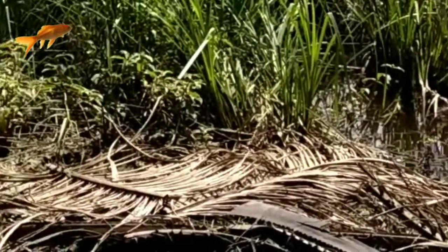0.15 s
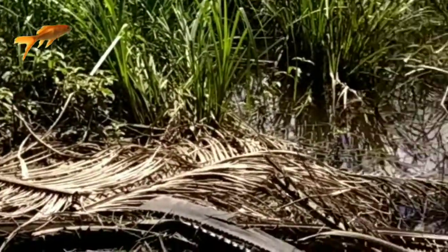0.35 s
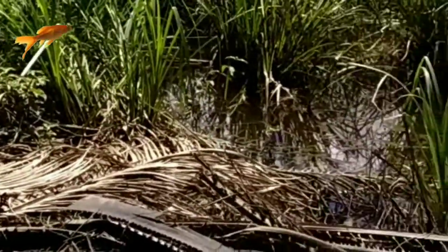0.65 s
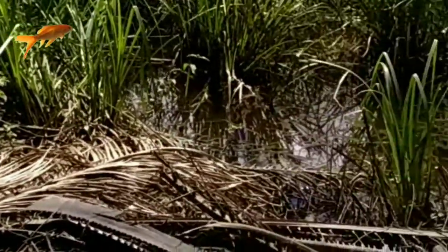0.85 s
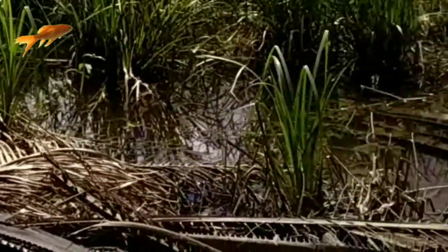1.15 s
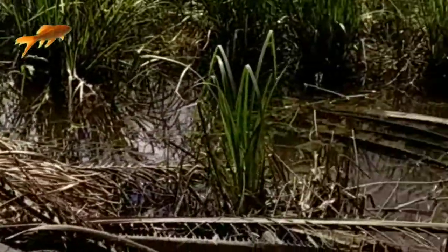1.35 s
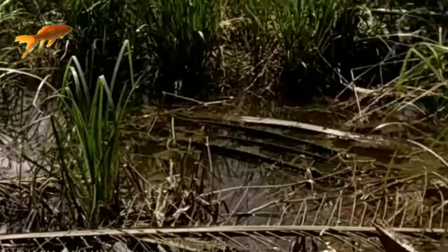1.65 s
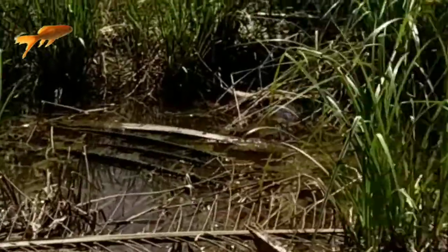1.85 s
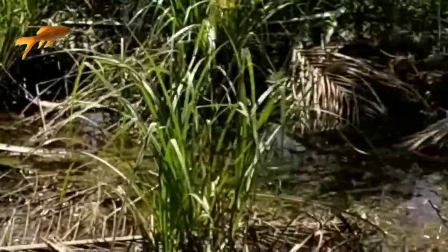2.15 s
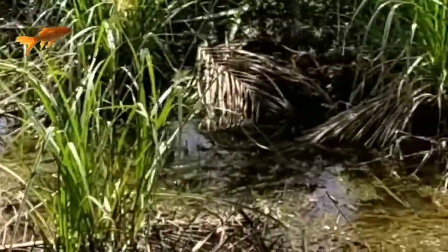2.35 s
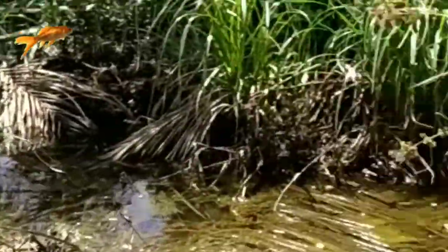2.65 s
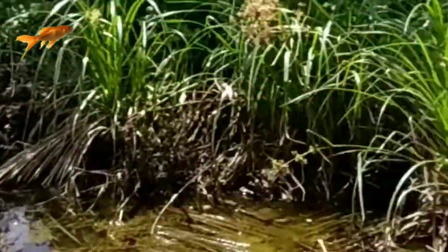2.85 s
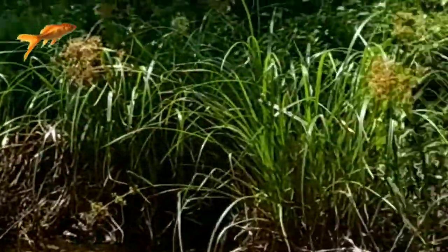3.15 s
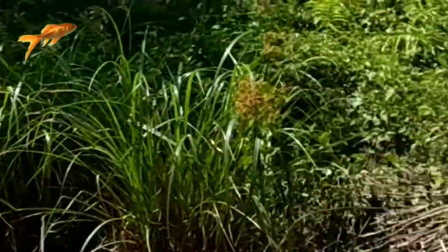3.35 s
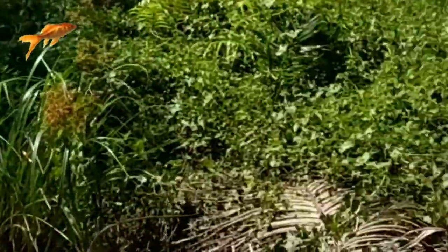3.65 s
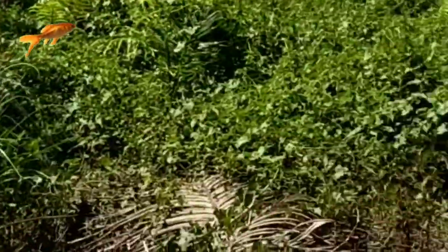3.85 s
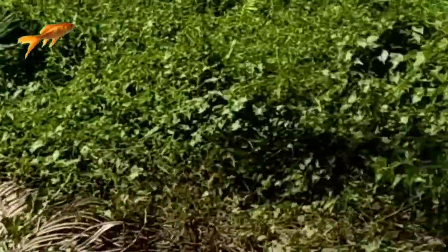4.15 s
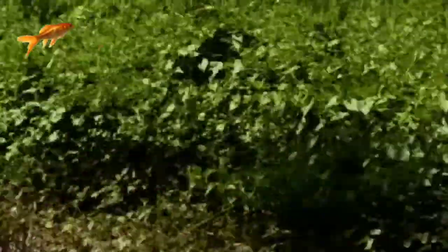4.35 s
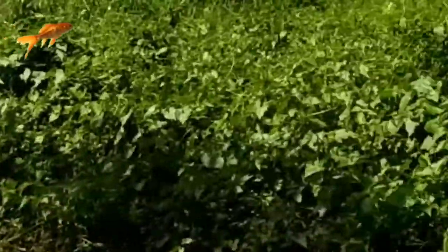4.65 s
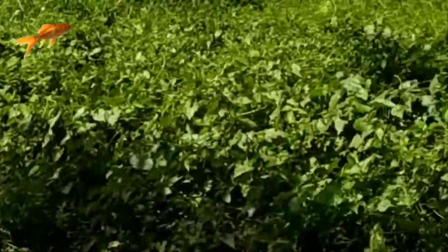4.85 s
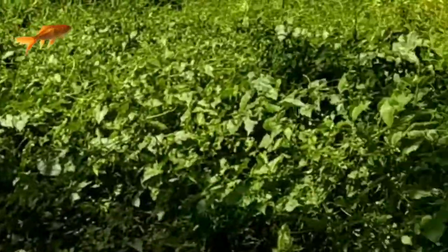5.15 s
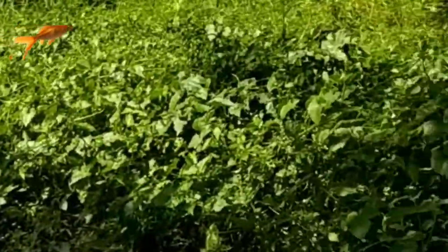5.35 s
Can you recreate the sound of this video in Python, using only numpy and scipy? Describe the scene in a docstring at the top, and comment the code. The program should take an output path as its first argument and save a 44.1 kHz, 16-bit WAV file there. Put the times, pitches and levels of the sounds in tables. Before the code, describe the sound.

Crickets shrill in a rapid, steady buzz outdoors; a handling knock, a rustling snap of dry leaves, and a late faint click interrupt.

```python
"""Two crickets trill throughout in a sunny swamp, in fast three-stroke chirps, over a chorus of far insects.
The hand-held microphone is knocked at 0.3 s; from 0.8 s puffs of light air buffet its ports.
Birds call faintly far away from 1.2 s; around 2 s a step rustles and snaps dry fronds, and 5.3 s brings
one more sharp snap. Crickets and birds are gliding tones; insects, air and scuffs are shaped noise;
snaps are filtered clicks, and knocks are single pressure swings."""
import sys
import numpy as np
from scipy import signal
from scipy.fft import rfft, irfft
from scipy.io import wavfile

SR = 44100
rng = np.random.default_rng(int(sys.argv[2]) if len(sys.argv) > 2 else 0)


def inscribe(sig):
    """Save sig as 16-bit PCM at rate SR to the path in sys.argv[1].

    A 1-D sig is mono; a 2-D sig holds one channel per row.
    Samples are clipped to [-1, 1] before scaling.
    """
    pcm = np.round(np.clip(np.atleast_2d(sig).T, -1, 1) * 32767)
    wavfile.write(sys.argv[1], SR, pcm.astype(np.int16))


N = 242991
TIME = np.arange(N) / SR   # seconds


def from_db(db):
    """Turn decibels into a gain."""
    return 10 ** (np.asarray(db) / 20)


def rms_one(x):
    """Scale to unit power."""
    return x / np.sqrt(np.mean(x ** 2) + 1e-20)


def in_time(rows):
    """Draw each column of a table as a curve through time, joined by straight lines."""
    s, *columns = np.transpose(rows)
    return [np.interp(TIME, s, column) for column in columns]


def panned(x, balance_db):
    """Place a sound between the sides; a positive balance makes the left louder."""
    lean = from_db(np.atleast_1d(balance_db) / 2)
    return x * np.array([lean, 1 / lean])


def swell(s, half_s):
    """A smooth, bell-shaped rise and fall around a moment."""
    return np.exp(-np.minimum(((TIME - s) / half_s) ** 2 / 2, 50))


def drift(rate_hz):
    """A random curve of spread 1 whose changes weaken above the given rate."""
    hz = np.fft.rfftfreq(N, 1 / SR)
    return rms_one(irfft(rfft(rng.standard_normal(N)) / (1 + (hz / rate_hz) ** 2), N))


def passband(x, low_hz, high_hz):
    """Keep mainly what lies between two frequencies."""
    edges = [low_hz, np.clip(high_hz, low_hz + 50, SR * .45)]
    return signal.sosfilt(signal.butter(2, edges, "band", fs=SR, output="sos"), x)


def noise(spectrum, alike):
    """Steady stereo noise of a given colour; alike runs from 0 (unrelated sides) to 1 (same on both)."""
    table_hz, table_db = np.transpose(spectrum)
    hz = np.fft.rfftfreq(N, 1 / SR)
    gain = from_db(np.interp(np.log(hz + 1), np.log(table_hz), table_db, left=-90, right=-90))
    mid, side = irfft(rfft(rng.standard_normal((2, N))) * gain, N)
    alike = np.clip(alike, -1, 1)
    return rms_one(np.sqrt(1 + alike) * mid + np.sqrt(1 - alike) * side * [[1], [-1]])


def thicket(x, scatter_db, t60, count=4):
    """Stems and leaves add a short diffuse tail, different on each side, that shifts as the microphone turns."""
    age = TIME[:SR // 5]
    out = np.array([x, x])
    for _ in range(count):
        # each tail falls 60 dB in t60 seconds
        tail = rng.standard_normal((2, len(age))) * from_db(-60 * age / t60)
        tail /= np.sqrt(count * np.sum(tail ** 2, axis=1, keepdims=True))
        turns_per_s = rng.uniform(0.52, 1)
        turn = np.sqrt(2) * np.cos(2 * np.pi * (turns_per_s * TIME + rng.random()))
        scattered = signal.oaconvolve(x[None], tail, axes=1)[:, :N]
        out += from_db(scatter_db) * turn * scattered
    return rms_one(out)


def crickets():
    """Two singers at slightly different pitch and pace slide in and out of step."""
    # the near cricket, as the microphone turns past it: t/s, level before a 5 dB cut/dB, left over right/dB
    near_place = [(0, -41.5, 4), (.3, -38.5, 1), (.95, -36.5, 3), (1.15, -36.5, -2), (1.5, -37, 4),
                  (2, -35.5, 3), (2.5, -39.5, -0.5), (3, -46, 14), (3.4, -45.5, 8), (3.8, -48, 4),
                  (4.4, -44, -1), (5.5, -51, 2)]
    # the farther, higher cricket: t/s, level/dB, left over right/dB
    far_place = [(0, -78, -8), (.5, -63, -2), (2.4, -61.5, 10), (3.1, -54, 5), (4, -51, -3),
                 (4.5, -55.5, -3), (5.5, -58, 4)]
    # the wings' octave, beamed more narrowly: t/s, level/dB, left over right/dB
    octave_place = [(0, -62.5, 26), (2.2, -56.5, 18), (2.6, -48, 6.5), (3.3, -64.5, 36), (4.4, -51.5, 12),
                    (5.5, -59, 20)]
    # how far each cricket falls behind an even pace: t/s, lag/s
    near_lag = [(0, -.003), (.3, -.0035), (.9, -.002), (1.55, -.0042), (1.85, -.004), (2.5, .0012),
                (2.82, -.0005), (2.98, -.003), (3.3, -.0028), (3.6, .0007), (4, .0015), (4.15, .0043),
                (4.8, .0032), (5.4, .008)]
    far_lag = [(0, .018), (2.3, .0195), (2.85, .0168), (3.4, .0076), (3.9, -.002), (4.4, -.0077),
               (5.5, -.0159)]
    # the near cricket leans by degrees into its opening stroke: t/s, that stroke against the other two/dB
    near_opening = [(0, -9.5), (.9, -3.5), (1.6, -2.5), (2.1, -1)]
    near_wander_db, near_wander_hz = .6, 7.4
    wing_edge_hz = 6300   # the wings radiate next to nothing below this

    near_db, near_pan = in_time(near_place)
    far_db, far_pan = in_time(far_place)
    octave_db, octave_pan = in_time(octave_place)
    near, near_octave = wings(near_lag, hz=7311, fall_hz=125, stroke_s=0.0024,
                              opening_db=in_time(near_opening)[0], uneven_db=1.1,
                              scatter_hz=25, rasp=0.035)
    far, far_octave = wings(far_lag, hz=8010, fall_hz=235.0, stroke_s=0.00227,
                            opening_db=-11, uneven_db=1.0, scatter_hz=49.9, rasp=0.31)

    near = thicket(near, scatter_db=-16, t60=.06)
    near_level = from_db(near_db - 5.0 + near_wander_db * drift(near_wander_hz))
    near = panned(near, near_pan) * near_level
    far = panned(thicket(far, scatter_db=-9.5, t60=0.038), far_pan) * from_db(far_db)
    octave = thicket(near_octave + from_db(8.0) * far_octave, scatter_db=-6, t60=0.14)
    song = near + far + panned(octave, octave_pan) * from_db(octave_db)
    return signal.sosfilt(signal.cheby1(10, .2, wing_edge_hz, "high", fs=SR, output="sos"), song)


def wings(lag, hz, fall_hz, stroke_s, opening_db, uneven_db, scatter_hz, rasp):
    """Three wing strokes a chirp, each a short tone that sinks as the scraper slows; gives tone and octave."""
    chirps_per_s = 24.19
    stroke_gap_s, stroke_slip_s = .0103, .00015   # spacing, and its random spread
    squareness = 2.7     # 2 = bell-shaped stroke, more = flatter top
    octave_rasp = .4     # phase wobble of the octave, radians (rasp is that of the tone)

    # which chirp and which stroke (-1, 0 or 1) each sample belongs to
    beat = (TIME - in_time(lag)[0]) * chirps_per_s
    chirp = np.round(beat).astype(int)
    in_chirp = (beat - chirp) / chirps_per_s
    stroke = np.clip(np.round(in_chirp / stroke_gap_s), -1, 1).astype(int)

    # every stroke has its own strength, pitch, starting phase and timing
    force, detune, start, slip = rng.standard_normal((200, 3, 4))[chirp, stroke + 1].T
    travel = (in_chirp - stroke * stroke_gap_s - stroke_slip_s * slip) / stroke_s
    stroke_db = opening_db * (stroke < 0) + uneven_db * force
    pressure = np.exp(-np.abs(travel) ** squareness) * from_db(stroke_db)
    pitch = hz - fall_hz * np.clip(travel, -2, 2) + scatter_hz * detune
    phase = 2 * np.pi * (np.cumsum(pitch) / SR + start)   # every stroke starts the wing afresh
    teeth = drift(960)   # uneven teeth roughen the tone, and the octave more
    tone = pressure * np.sin(phase + rasp * teeth)
    octave = pressure * np.sin(2 * phase + octave_rasp * teeth)
    return tone, octave


def chorus():
    """Countless far insects merge into a steady band; higher groups swell and ebb, each on its own."""
    # colour of the steady band: f/Hz, relative level per Hz/dB
    band_colour = [(6400, -68), (6700, -11.5), (7000, 6.5), (7400, 6.5), (7700, 4), (8000, 5), (8600, -17),
                   (9600, -18), (10600, -19.5), (13500, -27.5), (14050, -6), (14950, -9), (15400, -15),
                   (16000, -27)]
    # a higher fizz of insects, left behind as the microphone turns: t/s, level/dB
    fizz_level = [(0, -58), (.7, -57.5), (1.3, -58.5), (2, -54), (2.4, -59), (4, -61), (5.5, -61)]
    # groups within the fizz: centre f/Hz, width/Hz, level against the fizz/dB
    fizz_groups = [(8320, 350, 0), (8990, 350, -3.5), (9680, 690, -4)]
    swell_db, swell_rate_hz = 3, 20

    out = noise(band_colour, alike=0.043) * from_db(-45)
    fizz_db = in_time(fizz_level)[0]
    for hz, width, db in fizz_groups:
        hiss = rng.standard_normal((2, N))
        group = rms_one(passband(hiss, hz - width / 2, hz + width / 2))
        out = out + group * from_db(fizz_db + db + swell_db * drift(swell_rate_hz))
    return out


def knocks():
    """Each bump squeezes the air at a port: one swing up, one down, and the other way round on letting go."""
    # knocks on the housing: t/s, peak level/dB, half-width/s, left over right/dB, +1 pressed or -1 let go
    thumps = [(0.287, -24.5, 0.0034, -26, 1), (0.2836, -32, 0.00082, -31.5, 1),
              (0.2949, -33.5, 0.0011, -21, -1), (0.312, -43.5, 0.0014, -14, 1), (.326, -49, 0.0035, -21, 1),
              (2.0384, -44.5, 0.00064, 18, 1), (2.048, -45, 0.0012, 11, 1), (2.055, -44.5, 0.00074, -7, 1),
              (2.185, -48, 0.00061, -15, 1), (2.193, -43.5, 0.00133, -12, 1),
              (2.2691, -44.5, 0.00067, 27, 1), (2.274, -42.5, 0.002, 20.5, 1), (2.304, -49.5, 0.001, 21, 1),
              (2.317, -47.5, 0.0024, 24, 1)]
    out = np.zeros((2, N))
    for s, db, width, pan, way in thumps:
        u = np.sign(way) * np.clip((s - TIME) / width, -10, 10)
        out += panned(from_db(db) * u * np.exp((1 - u ** 2) / 2), pan)
    return out


def snaps():
    """Brittle contacts ring for only a few cycles, as clicks through a band filter."""
    # sharp snaps and ticks: t/s, peak level/dB, low f/Hz, high f/Hz, left over right/dB
    snap_rows = [(0.282, -34, 450, 840, -17.5), (0.2826, -35.5, 2040, 2620, -26),
                 (0.2948, -20, 6500, 9700, -27), (0.3135, -33, 7000, 11000, -18),
                 (1.9, -50.5, 607, 3000, -13), (1.942, -54, 4200, 6203, 0), (1.955, -49, 250, 900, -10),
                 (1.967, -47, 250, 1300, -8), (1.972, -50, 250, 800, -10), (2.004, -47, 700, 3500, -3),
                 (2.011, -43, 250, 1800, -1), (2.0276, -31, 250, 3600, -16), (2.03, -38, 300, 3000, -8),
                 (2.037, -40, 464, 1650, 13), (2.044, -48, 1800, 3400, 6), (2.23, -39, 2400, 4300, 15),
                 (2.235, -38, 2800, 4406, 14), (2.2355, -42, 1500, 3800, 12),
                 (2.2379, -30.5, 930, 1590, 21.5), (2.2365, -36, 2360, 5870, 13),
                 (2.2374, -36, 9400, 10800, 13), (2.2386, -28, 2030, 4330, 24.5),
                 (2.258, -31, 7000, 10500, 9), (2.2726, -25, 5800, 13400, 19), (2.2726, -45, 1500, 6000, 2),
                 (5.269, -29, 8500, 10500, 4), (5.27, -50, 500, 1800, -3), (5.269, -43.5, 3800, 5720, 2)]
    out = np.zeros((2, N))
    for s, db, low, high, pan in snap_rows:
        click = passband(signal.unit_impulse(SR // 20, 0), low, high)
        click = click / np.abs(click).max() * from_db(db)
        start = round(s * SR)
        out[:, start:start + len(click)] += panned(click, pan)
    return out


def scuffs(crackle_db=4.5):
    """Rubbing swells and fades as a cloud of tiny uneven cracks."""
    # fingers, feet and dry leaves: centre t/s, level/dB, half-length/s, low f/Hz, high f/Hz, left over right/dB
    scuff_rows = [(0.025, -54, 0.0032, 210, 390, 0.5), (0.174, -55.5, 0.002, 120, 380, -9),
                  (0.2852, -32, 0.0013, 7000, 8900, -11), (0.28, -35, 0.0024, 1580, 11000, -17.5),
                  (0.2826, -41, 0.0015, 330, 650, -8.5), (0.2865, -37, 0.0018, 3800, 5500, -12),
                  (0.293, -40, 0.00087, 7300, 10600, -14), (0.304, -42, 0.004, 6200, 13000, -4),
                  (0.3027, -54, 0.006, 260, 4600, -7), (0.765, -61.5, 0.0063, 150, 430, -5),
                  (0.788, -60.5, 0.005, 250, 860, -3), (1.224, -64.5, 0.012, 140, 680, -4),
                  (1.635, -59.5, 0.036, 250, 12000, -1), (1.974, -55.5, 0.026, 120, 550, -16),
                  (1.975, -54, 0.061, 1200, 13000, -4), (1.98, -50.5, .009, 8000, 12000, 2),
                  (2.03, -49, 0.017, 130, 570, -4), (2.033, -57, 0.016, 990, 3700, 4.5),
                  (2.029, -48, .002, 400, 4000, -8), (2.238, -42.5, 0.0075, 980, 4300, 3),
                  (2.239, -47, 0.012, 90, 437, 1), (2.272, -56, 0.004, 400, 6700, 3),
                  (3.016, -58.5, 0.017, 180, 4700, 3.5), (3.008, -62, .012, 250, 460, 1),
                  (4.09, -69, 0.077, 200, 510, -2), (4.068, -66, 0.0043, 250, 780, -1),
                  (4.127, -60.5, .006, 230, 450, -2), (5.282, -47, 0.015, 8040, 15300, 3),
                  (5.283, -59, .009, 5140, 5700, -2), (5.277, -59, 0.0089, 400, 3300, 3)]
    out = np.zeros((2, N))
    crackle = from_db(crackle_db * np.clip(drift(470), -2, 2))
    grains = rng.standard_normal((2, N)) * crackle
    for s, db, half_s, low, high, pan in scuff_rows:
        rub = rms_one(passband(grains, low, high))
        out += panned(rub * swell(s, half_s) * from_db(db), pan)
    return out


def wind():
    """Puffs ride on a faint, unsteady breeze; each drives big lumps and small eddies at the ports."""
    # puffs: t/s, level before a final 1 dB cut/dB, half-length/s, eddies against lumps/dB, left over right/dB
    gusts = [(0.833, -59, 0.026, -7, -16), (0.982, -54, 0.043, -18, -20), (1.165, -54, 0.021, -2, -18),
             (1.306, -43, 0.012, -7, -17), (1.518, -50, 0.015, -7, 23), (1.79, -53, 0.084, -7, 12),
             (2.304, -46.5, 0.064, -13, -1.5), (2.79, -64, 0.29, -5.5, -9), (3.54, -64, 0.033, -34, 27),
             (3.78, -43.5, 0.039, -4.5, -8), (3.935, -43.5, 0.042, -4, -13.5),
             (4.269, -39.5, 0.032, -9, 13.5), (4.44, -48.5, 0.033, -16, 18)]
    # colour of the big lumps: f/Hz, relative level per Hz/dB
    lump_colour = [(12, 4), (25, -2.5), (45, -10), (65, -16), (100, -58), (200, -51)]
    # colour of the small eddies: f/Hz, relative level per Hz/dB
    eddy_colour = [(40, 4), (66, 3.5), (90, -10), (125, -19), (200, -56)]
    # the breeze between puffs: t/s, level before the same 1 dB cut/dB
    breeze_level = [(0, -60), (2, -55), (3.3, -56.5), (4.7, -53.5), (5.3, -66)]
    breeze_swing_db, breeze_eddies_db, breeze_pan_db = 3.5, -16, -4.5

    lumps = noise(lump_colour, alike=0.031)
    eddies = noise(eddy_colour, alike=0.29)
    breeze = from_db(in_time(breeze_level)[0] + breeze_swing_db * drift(3.7))
    out = panned(breeze * (lumps + from_db(breeze_eddies_db) * eddies), breeze_pan_db)
    for s, db, half_s, eddies_db, pan in gusts:
        puff = from_db(db) * swell(s, half_s)
        out += panned(puff * (lumps + from_db(eddies_db) * eddies), pan)
    return from_db(-1.0) * out


def birds(waver_hz=45, flutter_db=2.0):
    """Short gliding, wavering whistles over fainter chatter, broken up by distance."""
    # far notes: centre t/s, level before flutter, scatter and a final 4 dB cut/dB, half-length/s, f/Hz, glide/(Hz/s)
    notes = [(1.2, -65, 0.027, 662, 3.5), (2.472, -58.5, 0.009, 1346, -1200),
             (2.809, -65, 0.011, 1610, 1497), (3.01, -60, 0.0085, 1710, -3000),
             (3.047, -60, 0.0081, 1390, -8000), (3.05, -64, 0.038, 630, -4), (3.2, -56, 0.011, 1990, -2500),
             (3.23, -63, 0.011, 782, 11999.5), (3.53, -61, 0.036, 1750, 0), (3.777, -60, 0.02, 1540, 799.5),
             (4.028, -66, .014, 1410, -3000), (4.055, -66, .014, 850, 1),
             (4.507, -60.5, 0.012, 1730, -5000), (4.58, -64, 0.012, 1293, -2000),
             (4.748, -60, 0.013, 1577, 1503.5), (4.795, -64, 0.011, 1700, 1),
             (4.84, -66, 0.011, 1605, -1000), (4.953, -64, .02, 1904, -1000)]
    # a murmur of still farther birds, its level set like that of the notes
    chatter_count, chatter_db = 12, -70
    chatter_s, chatter_hz = (2.4, 5.2), (1400, 2000)   # ranges of time and pitch

    out = np.zeros(N)
    waver = waver_hz * drift(70.2)
    chatter = [(rng.uniform(*chatter_s), chatter_db, .016, rng.uniform(*chatter_hz), rng.normal(0, 2000))
               for _ in range(chatter_count)]
    for s, db, half_s, hz, glide in notes + chatter:
        pitch = hz + glide * (TIME - s) + waver
        phase = 2 * np.pi * np.cumsum(pitch) / SR
        out += from_db(db) * swell(s, half_s) * np.sin(phase)
    far_calls = thicket(out * from_db(flutter_db * drift(60)), scatter_db=-2, t60=.2)
    # thicket evens out the power, so the strength of the calls is put back here
    return np.std(out) * from_db(-4) * far_calls


def air():
    """A soft outdoor hush and a far rumble, both made of coloured noise."""
    # colour of the still air over the swamp: f/Hz, relative level per Hz/dB
    hush_colour = [(60, 10), (300, 3), (650, 2.5), (1200, 2), (1900, 4.5), (3000, 2), (5000, 0), (6500, 3),
                   (12000, -34), (16000, 8)]
    # distant rumble beyond the swamp: t/s, level/dB
    rumble_level = [(0, -70.5), (1.2, -69), (2.6, -67), (3.4, -77), (4.1, -70.5), (4.7, -78), (5.5, -71)]
    # colour of that rumble: f/Hz, relative level per Hz/dB
    rumble_colour = [(70, -0.5), (140, -1), (200, -3), (280, 0.5), (380, -8.5), (600, -14.5), (1200, -16.5)]
    rumble_db, = in_time(rumble_level)
    rumble = from_db(rumble_db) * noise(rumble_colour, alike=0.62)
    hush = from_db(-64) * noise(hush_colour, alike=0.063)
    return rumble + hush


def scene():
    """Add up the insects, the air and the small sounds around the microphone."""
    return crickets() + chorus() + air() + wind() + knocks() + snaps() + scuffs() + birds()


def record(dry):
    """Cut the top steeply."""
    cutoff_hz = 15450
    return signal.sosfilt(signal.ellip(14, .1, 80, cutoff_hz, fs=SR, output="sos"), dry)


dry = scene()
out = record(dry)
inscribe(out)
```